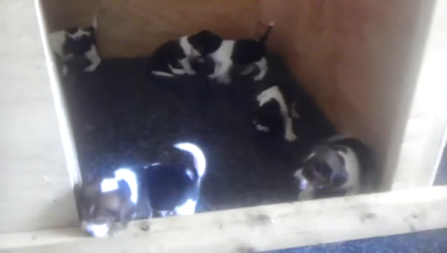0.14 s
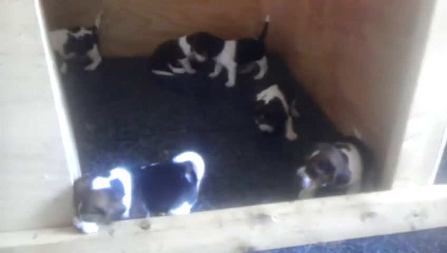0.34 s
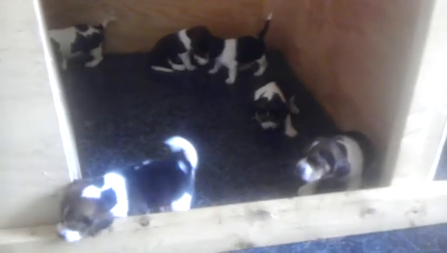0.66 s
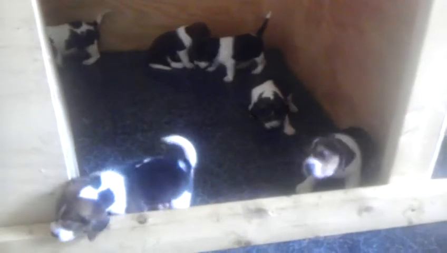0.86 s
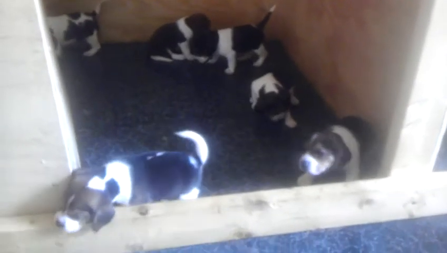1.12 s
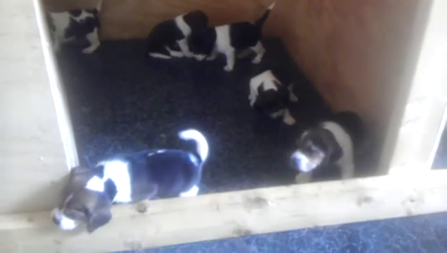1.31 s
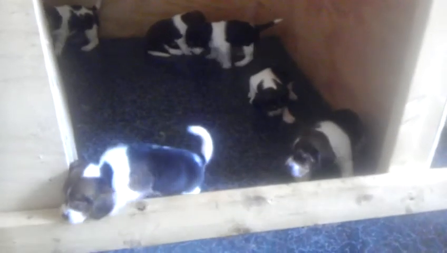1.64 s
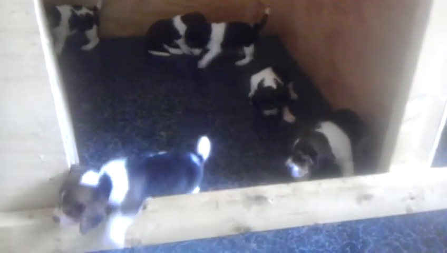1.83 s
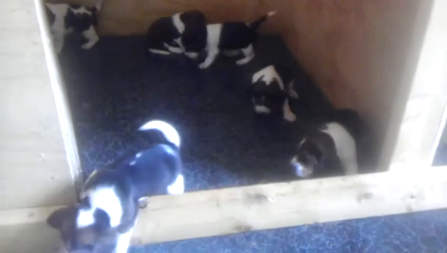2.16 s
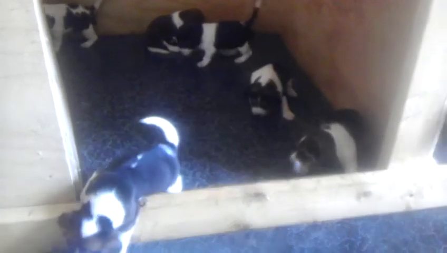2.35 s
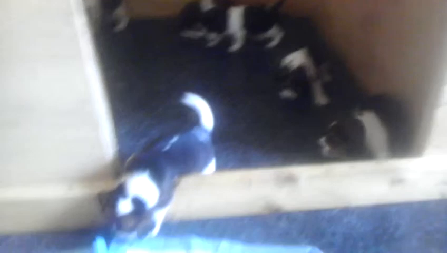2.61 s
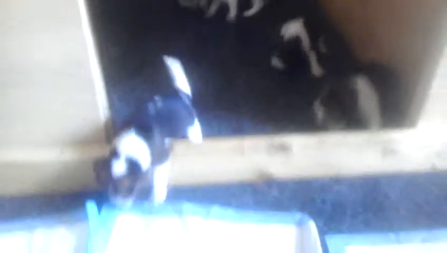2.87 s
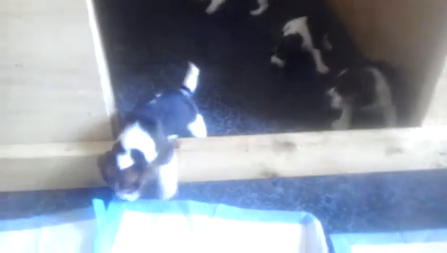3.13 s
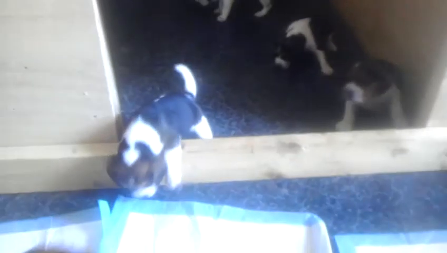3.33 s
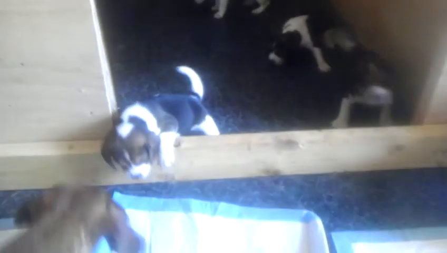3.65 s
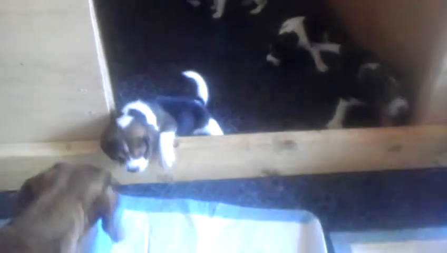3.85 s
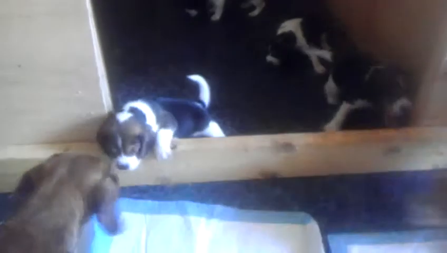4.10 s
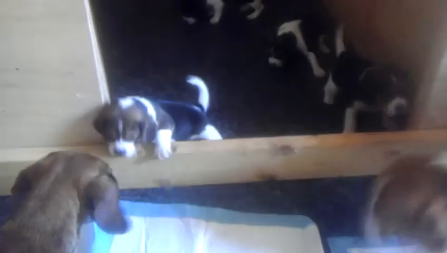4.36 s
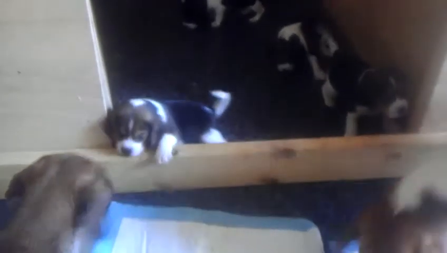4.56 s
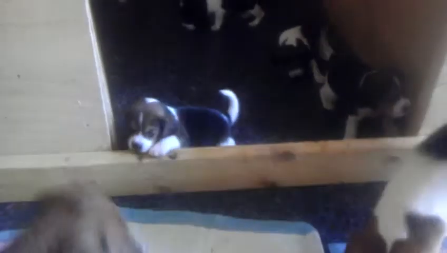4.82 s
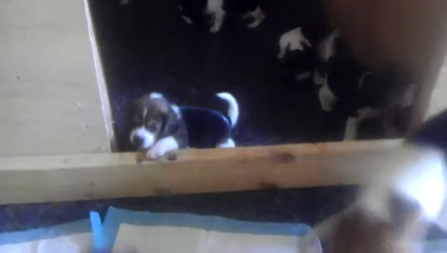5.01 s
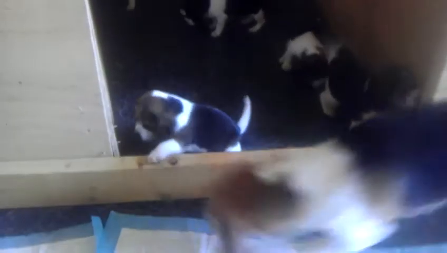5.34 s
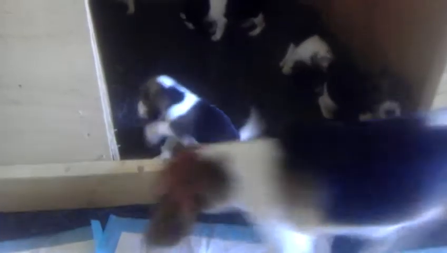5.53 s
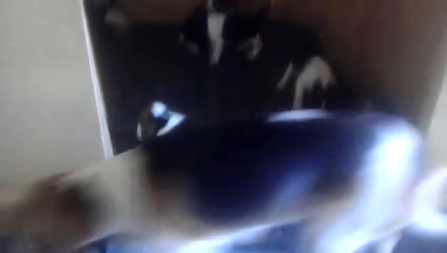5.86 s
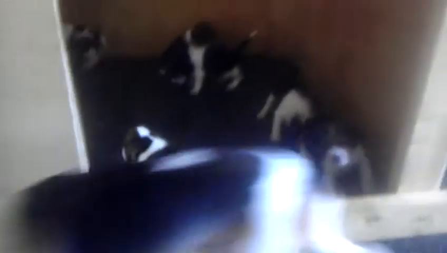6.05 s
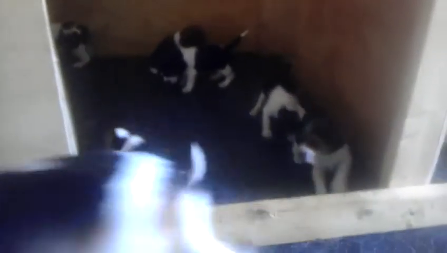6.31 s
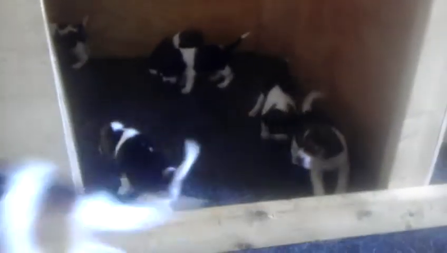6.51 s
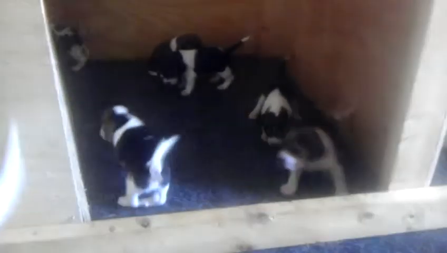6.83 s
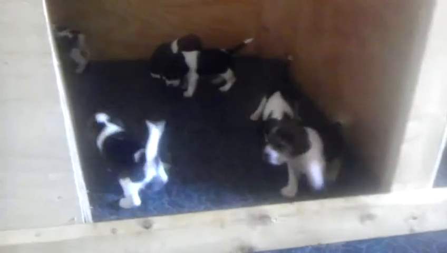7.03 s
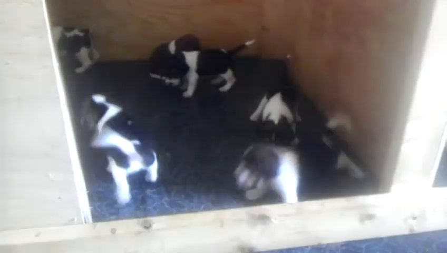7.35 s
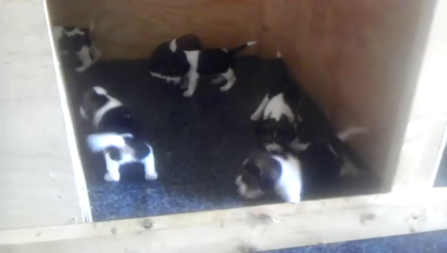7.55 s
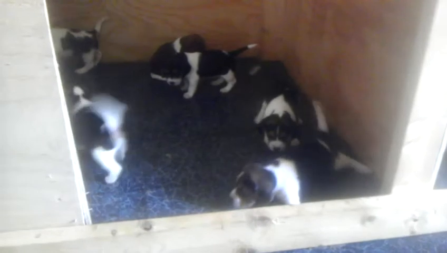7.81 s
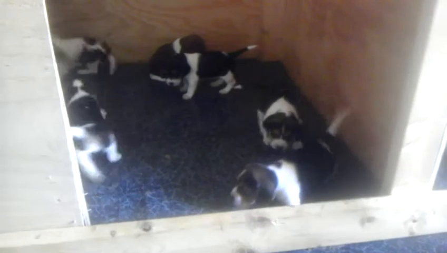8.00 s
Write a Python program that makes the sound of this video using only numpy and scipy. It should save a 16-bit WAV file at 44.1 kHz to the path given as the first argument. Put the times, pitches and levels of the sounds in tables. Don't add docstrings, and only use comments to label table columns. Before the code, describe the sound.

Close in a small bare room, a puppy gives a string of short, high, gliding whines over faint shuffling. After about four seconds the whining stops and a paw thumps dully on a wooden plank. Sparse soft scuffs follow, with one very thin nasal whistle, then brisk claw clicks on hard floor, hollow board knocks and a brief wooden scrape at the end. Light microphone hiss rises and falls with the movement.

```python
import sys
import numpy as np
from scipy import signal
from scipy.fft import rfft, irfft, next_fast_len
from scipy.io import wavfile
from scipy.ndimage import uniform_filter1d, minimum_filter1d, map_coordinates

SR = 44100
rng = np.random.default_rng(int(sys.argv[2]) if len(sys.argv) > 2 else 0)


def invert_db(x):
    u = np.asarray(x, float) / 20
    return 10 ** u


def transcribe(u):
    v = np.clip(np.atleast_2d(u).T, -1, 1)
    q = np.round(v * 32767).astype(np.int16)
    wavfile.write(sys.argv[1], SR, q)


N = 360297

# start_s, turn_s, end_s, level_db, swell_to_turn_db
WHINES = [(0, 0.106, .19, -29.5, 2.5), (0.33, 0.397, .52, -28, 10), (0.677, 0.678, .735, -37, 5),
          (0.868, 0.88, .92, -36, 4), (1.455, 1.485, 1.5, -33.5, 2), (1.709, 1.765, 1.787, -31, -2.5),
          (1.921, 1.984, 2.045, -28, -4), (2.193, 2.254, 2.308, -28, -5), (2.47, 2.55, 2.655, -26, 5),
          (2.829, 2.891, 3.015, -30, 9), (3.195, 3.267, 3.315, -37, 8), (3.452, 3.496, 3.545, -34.5, 6),
          (3.764, 3.823, 3.838, -25.5, 7), (4.006, 4.06, 4.082, -27, 3), (4.225, 4.287, 4.335, -26.5, 7)]
# first_note_held_s, start_hz, turn_hz, before_break_hz, end_hz
WHINE_TUNES = [(0.032, 1115, 1042, 996, 943), (0, 972, 982, 947.3, 863), (0, 930, 937, 908, 890),
               (0, 914, 942, 897, 857), (0, 735, 807, 810, 705), (0, 750, 808, 762, 720),
               (0, 751, 959.5, 916, 880), (.028, 796.3, 948, 850, 750), (0, 939, 1063, 977, 762),
               (0, 975, 998.5, 1010, 985), (0, 959, 965, 960, 800), (0, 777, 763, 858, 786),
               (0, 965, 1160, 1165, 1150), (0, 1176, 1298, 1360, 1393), (0.01, 1000, 1055, 1005, 880)]
# octave_db, overtones_db, top_lift_db, pan_db, roughness_0_1
MOUTHS = [(-8, -2.5, -3.5, -2, 0.23), (-5.5, -13.5, 4.5, -1, 0.24), (7, -9, 5, -2, 0.6),
          (6, -10, 7.5, -2, 0.63), (-10, -25, -2, 0, 1), (-16, -24, -3, -5.5, 0.57),
          (-10.5, -20, -13, -3.5, .6), (-7, -15.5, -6, -3.5, 0.5), (-18.5, -17.5, -7, -0.5, 0),
          (-18, -22, 5, -2, 0.1), (0, -7, 5, -2, 0.5), (3, -12, 11.5, 2, 0.55), (-21, -18, 5, -2, 0.72),
          (-29, -25, 13.5, 6.5, 0.41), (-7.5, -23, 17, 7, 0.59)]
# fundamental_db, octave_db, overtones_db
PHRASING = [(.045, 0, 0, -1, -6), (.03, 5, 0, 0, 0), (.025, 0, 3, -17, -5), (.02, 0, 2, -17, -5),
            (.014, -3, 0, -8, 0), (.015, 3, -3, -3, -3), (.02, 12, -3, 0, -3), (.014, 14, 0, 0, -4),
            (.035, 5, 0, 0, 0), (.012, 2, -2, 6, 3), (.03, 3, -3, 3, 2), (.03, 10, 2, -6, 0),
            (.012, -5, 0, -8, 0), (.015, 3, -2, 0, 0), (.025, 0, -1.5, -1, -2)]
# fundamental_db, octave_db, overtones_db
BREAK_DB = (-3, -10.5, -28)
SWELL_SHARE = (1.13, 0.8)
# freq_hz, level_db
THROAT = [(700, -13), (2800, -22), (3600, -17), (4500, 5.5), (5200, 9), (6000, -5), (7000, -18),
          (9000, -17.5), (11500, -31), (14000, -34)]
# freq_hz, width_hz, level_db
PEN_MODES = [(777, 27.5, 4.5), (887.6, 17, 7), (991.7, 38, -6), (1072, 39, 5), (1228, 23, -5.5),
             (1366, 110, 1)]
# time_s, level_db
BUSTLE = [(0, -54), (.29, -56.5), (.9, -64.5), (1.2, -66), (1.41, -63), (1.73, -62), (2.75, -60),
          (3.3, -56), (3.621, -68.5), (3.85, -61.5), (4.23, -62.5), (4.64, -75.5), (5.03, -72),
          (5.62, -64.5), (6, -71.5), (7.42, -69.5), (7.65, -55.5), (8.17, -61.5)]
# freq_hz, density_db_per_hz
RUMBLE = [(15, -77), (25, -43), (66, -10), (160, -10.5), (211, 2), (258, -8), (399, -6.5), (557, -10),
          (800, -13.5), (1040, -19), (1760, -120)]
# freq_hz, density_db_per_hz
SCUFF = [(350, -23.5), (600, -6.5), (1040, 2), (1210, 1), (1460, -6), (1570, -0.5), (1940, -2.5),
         (2990, -1), (5600, -9), (6300, -17), (9750, -17.5), (16500, -120)]
# freq_hz, density_db_per_hz
HISS = [(4500, -17), (6000, -24), (7500, -4), (11000, 4.5), (14200, 3.5)]
# time_s, peak_db, t60_s, paw_weight_db
STEPS = [(.3295, -34.5, 0.12, -23), (.6818, -43.5, 0.12, 5), (.846, -35.5, 0.44, 3),
         (1.0819, -43.5, 0.31, -13), (1.295, -36, 0.29, -2.5), (1.507, -42.5, 0.49, 2),
         (2.6883, -28, 0.14, -15), (3.1538, -33, 0.076, -3.5), (3.4385, -29.5, 0.36, -10.5),
         (4.564, -43.5, 0.39, -10), (5.8078, -39.5, 0.34, -2), (5.9713, -39.5, 0.2, -9),
         (6.2681, -32.5, 0.3, -6.5), (6.4199, -26, 0.23, -5), (6.5634, -48.5, 0.076, 0),
         (6.9265, -40, 0.23, -2.5), (7.0326, -18.5, 0.14, -18.5), (7.2487, -22, 0.18, -14),
         (7.3298, -33, 0.15, -15), (7.511, -40, 0.31, 4), (7.2551, -16.5, 0.23, -10),
         (7.345, -36, 0.16, -11.5), (1.154, -39, .1, -22)]
# brightness_db, sliding_s
STEP_FEEL = [(5, 0.0098), (5, 0.0082), (-1, 0.018), (11.5, 0.0096), (6.5, 0), (14, 0.0063), (6.5, 0.012),
             (20.5, 0.0039), (2, 0.017), (-1, 0.014), (-8, 0.015), (-2, 0.01), (-9.5, 0.0061), (-6.5, 0),
             (-9, 0.0055), (-3, 0.0088), (-4, 0.0024), (-6.5, 0), (6, 0.0099), (9, 0.0041), (-2.5, 0),
             (-6, 0), (2, 0)]
# time_s, peak_db, t60_s, paw_weight_db
SKIDS = [(.198, -46.5, 0.26, 13), (1.165, -39, 0.14, -17), (1.345, -45.5, 0.263, 7),
         (1.6838, -31, 0.21, -17), (1.8397, -34.5, 0.062, -3), (2.1779, -44, 1, 0), (2.378, -39, 0.25, 0.5),
         (2.5774, -34.5, 0.53, -34), (2.9664, -27.5, 0.17, -18), (3.2755, -29.5, 0.12, -20),
         (3.05, -54, 0.19, 18.5), (3.3448, -46.5, 0.4, 9.5), (4.182, -37, 0.76, -13),
         (4.885, -52.5, 0.16, -5), (5.088, -47, 0.28, -3.5), (5.236, -48, 0.065, -12),
         (5.4194, -44, 1, -12.5), (5.6555, -39, 0.077, -16.5), (5.8296, -32.5, 0.21, -1.5),
         (6.1035, -49, .32, -3), (6.168, -44, 0.31, -14.5), (6.6692, -55.5, 0.97, -7.5),
         (6.838, -41, 0.13, -4), (7.001, -38, 0.085, -4), (7.3494, -40.5, 0.45, -8.5),
         (7.56, -51, 0.22, 10.5), (7.66, -44, 0.51, 2.5), (7.7662, -36, 0.26, -2),
         (7.913, -37.5, 0.54, -32), (8.0162, -40.5, 0.4, -21), (.13, -37, 0.45, -6), (4.848, -58, 0.24, 1),
         (7.212, -53.5, .2, -13), (6.403, -43.5, 0.093, -7), (5.33, -54.5, .2, -13), (1.39, -50, 0.43, -14),
         (1.56, -52, 0.24, -23), (5.16, -56, 0.22, -10), (.05, -43, .2, -28), (7.09, -48, 0.081, -6.5),
         (6.79, -48, .2, -5), (5.59, -47, .2, -12), (7.48, -50, .2, -3)]
# brightness_db, sliding_s
SKID_FEEL = [(-6, 0.023), (5, 0.057), (10, 0.0079), (-5.5, 0.031), (-11, 0.0069), (5, .01), (10.5, 0.012),
             (2, .01), (1, 0.065), (-8, 0.011), (-3, .01), (-7, 0.034), (1, .01), (-5, 0.031), (1, 0.018),
             (-9, 0.0069), (2, .01), (-8, 0.0077), (-7, 0.0089), (-1, 0.038), (-0.5, 0.03), (-8, 0.052),
             (3, 0.0081), (1, 0.012), (1.5, .01), (8, .01), (2, .01), (-5, 0.013), (5.5, .01), (-6, .01),
             (-2.5, 0.035), (-3, 0.04), (0, .03), (-8, .01), (6, 0.067), (3, 0.095), (10.5, 0.034),
             (3, 0.043), (9, 0.054), (-10, 0.022), (2, .04), (-3, .05), (-3, .03)]
# freq_hz, level_db
CLAW = [(1000, -20), (1800, -7), (2600, 1), (3600, 0.5), (5500, -4), (6500, -13), (9000, -15.5),
        (14000, -41.5)]
# freq_hz, level_db
BLUNT = [(700, -18), (1300, -4.5), (2300, 2.5), (3200, -1), (4500, -25), (8000, -27)]
# freq_hz, level_db
FLOOR_BODY = [(400, -8), (650, -8.5), (950, -4), (1500, -8), (2200, -31)]
# freq_hz, level_db
THUD = [(60, -42.5), (120, 6.5), (210, 9.5), (400, 4), (700, -28)]
# time_s, peak_db, pitch_hz
KNOCKS = [(0.195, -34.5, 410), (0.215, -36, 662), (0.868, -38.5, 211), (1.246, -33, 374), (1.345, -31, 365),
          (1.447, -33.5, 408), (1.505, -34.5, 597), (2.292, -39, 220), (3.051, -35.5, 480),
          (3.35, -34, 410), (4.863, -53, 210), (7.529, -36, 296), (7.628, -31, 384), (7.69, -39, 210),
          (7.856, -39, 192), (8.115, -27, 205), (5.238, -52, 1200), (7.41, -48, 1200), (7.775, -44, 1180),
          (1.315, -49, 1130), (1.35, -37, 580)]
# time_s, peak_db, t60_s
THUMPS = [
    (4.576, -24.5, 0.11),
    (4.588, -23.5, 0.21),
]
# freq_hz, density_db_per_hz
PLANK = [(71, -67.5), (120, -62), (247, -14), (500, -7), (900, 0), (1500, -15.5), (2300, -13), (4400, -38),
         (6000, -76), (7800, -102), (13200, -120)]
# time_s, level_db
DRAG = [
    (8.09, -52),
    (8.108, -34.5),
    (8.17, -33),
]
# freq_hz, width_hz, level_db
BOARD_MODES = [(210, 30, 2.5), (436, 48, -8.5), (886, 140, -13), (1317, 65, -11), (1693, 33, 1),
               (1920, 90, -4), (2490, 26, -37), (2800, 55, -17)]
# freq_hz, correlation
ALIKE = [(60, 0.82), (200, 0.96), (700, 0.75), (2000, 0.15), (6000, 0.088), (14000, 0.099)]
# freq_hz, t60_s
ROOM = [(150, 0.24), (900, 0.24), (2000, 0.23), (5000, 0.21), (12000, 0.045)]
# start_s, stop_s, above_hz
TREBLE_GAPS = [
    (0.07, 0.173, 11800),
    (0.433, 0.48, 12200),
    (1.467, 1.493, 6400),
    (1.73, 1.81, 6900),
    (1.92, 1.995, 8600),
    (2.175, 2.319, 7500),
    (2.565, 2.619, 9300),
    (2.943, 3.01, 11800),
    (4.585, 4.613, 5030),
    (8.104, 8.175, 7560),
]

PEN_DIRECT = 0.93
ROUGH_DB, ROUGH_PITCH_RATIO = 5, 0.012
CHEST_DB, CREAK_DB = -38, -29
RUMBLE_DB, RUMBLE_DB_PER_SCUFF_DB = -61.5, 0.71
BODY_DB, BODY_DB_PER_WEIGHT_DB = -7, 0.8
WHISTLE_START_S, WHISTLE_END_S, WHISTLE_RISE_S, WHISTLE_FALL_S = 5.36, 5.64, 0.14, 0.07
WHISTLE_HZ, WHISTLE_DB, WHISTLE_SAG_HZ_PER_S = 4160, -53.5, 300
QUAVER_HZ, QUAVER_PER_S = 35, 10.5
TOP_HZ = 14150


def along(points, hz):
    f, v = np.transpose(points)
    return np.interp(np.log(hz + 1), np.log(f + 1), v)


def unit(x):
    return x / np.sqrt(np.mean(x ** 2) + 1e-20)


def wobble(rate, size):
    knots = rng.standard_normal(int(size * rate / SR) + 4)
    return map_coordinates(knots, [np.arange(size) * rate / SR])


def fades(t, rise_s, fall_s):
    return np.clip(np.minimum((t - t[0]) / rise_s, (t[-1] - t) / fall_s), 0, 1)


def add(track, s, x):
    i = max(round(s * SR), 0)
    track[:, i:i + x.shape[-1]] += x[..., :N - i]


def call(start, knots):
    s, *columns = np.transpose(knots)
    t = np.arange(start, s[-1], 1 / SR)
    return t, [np.interp(t, s, column) for column in columns]


def resonances(modes, f):
    return sum((-1) ** k * invert_db(db) * 1j * f * width / (hz * hz - f * f + 1j * f * width)
               for k, (hz, width, db) in enumerate(modes))


def rush(spectrum, patchy_db, spiky_db, size):
    z = signal.stft(rng.standard_normal((2, size + 512)), nperseg=512)[2]
    patches = uniform_filter1d(rng.standard_normal(z.shape[1:]), size=6, axis=0)
    patches = unit(uniform_filter1d(patches, size=8, axis=1))
    pair = signal.istft(z * invert_db(patchy_db * patches), nperseg=512)[1][:, :size]
    pair = pair * invert_db(spiky_db * wobble(400, size))
    hz = np.fft.rfftfreq(size, 1 / SR)
    turn = np.arccos(np.clip(along(ALIKE, hz), -1, 1)) / 2
    shape = invert_db(along(spectrum, hz)) * [np.cos(turn), np.sin(turn)]
    mid, side = irfft(rfft(pair) * shape, size)
    return unit(np.array([mid + side, mid - side]))


def room(x, wet_db):
    burst = rush([(20, 0), (20000, 0.034)], 0, 0, size=SR // 3)
    hz, t, z = signal.stft(burst, SR, nperseg=256)
    tail = signal.istft(z * invert_db(-60 * t / along(ROOM, hz)[:, None]), SR, nperseg=256)[1]
    tail = np.pad(tail / np.linalg.norm(tail[0]), ((0, 0), (130, 0)))
    wet = signal.fftconvolve(x.mean(0)[None], tail, axes=1)
    balance = np.linalg.norm(x, axis=1, keepdims=True) / np.linalg.norm(x) * np.sqrt(2)
    direct = np.pad(x, ((0, 0), (0, wet.shape[1] - x.shape[1])))
    return invert_db(wet_db) * wet * balance ** 0.49 + direct


def heard(x, wet_db):
    y = room(x, wet_db)
    return y * np.linalg.norm(x) / np.linalg.norm(y)


def whines():
    out = np.zeros((2, N))
    ears = np.array([[0.5], [-0.5]])
    for whine, tune, mouth, phrase in zip(WHINES, WHINE_TUNES, MOUTHS, PHRASING):
        start, top, end, db, swell_db = whine
        held, *notes_hz = tune
        octave_over_db, high_over_db, lift_db, pan_db, rough = mouth
        break_s, octave_swell_db, low_drift_db, octave_drift_db, high_drift_db = phrase

        times = [start, top, end - min(break_s, (end - top) * 3 / 4), end]
        knots = np.transpose([times, [1, 0, 0, 0], [0, 0, 1, 1], [0, 0, 0, 1]])
        t, (young, sagged, broken) = call(start, knots)
        size = len(t)

        glide = np.sin(np.pi / 2 * np.clip((t - start - held) / (top - start - held), 0, 1)) ** 1.4
        hz = notes_hz[0] + np.diff(notes_hz) @ [glide, sagged ** 1.624, broken ** 1.16]
        hz = uniform_filter1d(hz, size=400, mode="nearest")
        hz = hz * (1 + 0.00495 * wobble(93.8, size) + rough * ROUGH_PITCH_RATIO * wobble(260, size))
        turn = 2 * np.pi * np.cumsum(hz) / SR

        low_db = db - SWELL_SHARE[0] * swell_db * young + low_drift_db * sagged + BREAK_DB[0] * broken
        octave_db = db + octave_over_db - octave_swell_db * young
        octave_db = octave_db + octave_drift_db * sagged + BREAK_DB[1] * broken
        high_db = db + high_over_db - SWELL_SHARE[1] * swell_db * young
        high_db = high_db + high_drift_db * sagged + BREAK_DB[2] * broken
        flutter = invert_db(1.8 * wobble(60, size) + rough * ROUGH_DB * wobble(160, size))
        edge = fades(t, 0.0063, 0.0049)

        padded = next_fast_len(size + SR // 4)
        pen = PEN_DIRECT + resonances(PEN_MODES, np.fft.rfftfreq(padded, 1 / SR))
        first = edge * flutter * invert_db(low_db - 7.5) * np.sin(turn)
        first = irfft(rfft(first, padded) * pen, padded)
        second = flutter * invert_db(octave_db - 7 + 2.5 * wobble(45, size)) * np.sin(2 * turn + 1)
        high = invert_db(high_db - 29.5) * rush(THROAT, 2.8, 1.5, size)[0] * (1 + np.cos(turn))
        for k in range(3, 17):
            partial_db = high_db - 14.5 + along(THROAT, k * hz) + lift_db * (k * hz > 6800)
            high += invert_db(partial_db + 2.9 * wobble(41, size)) * np.sin(k * turn + k * k)
        closing = np.clip(np.arange(size)[::-1] / (0.0063 * SR), 0, 1)

        creak = rough * invert_db(low_db + CREAK_DB) * wobble(306.0, size) * np.sin(3 * turn / 2)
        chest = invert_db(db + CHEST_DB) * rush(THUD, 2.8, 2.7, size)
        pan = invert_db(ears * pan_db)
        voice = first * pan
        voice[:, :size] += edge * (creak * pan + chest)
        add(out, start, heard(1.43 * edge * second * pan, wet_db=-7))
        add(out, start, heard(1.475 * voice, wet_db=-0.5))
        add(out, start, heard(1.54 * edge * closing * high * invert_db(ears * 5.2), wet_db=-3.5))
    return out


def shuffle(feet):
    scuff_db = np.interp(np.arange(N) / SR, *np.transpose(BUSTLE))
    rumble_db = RUMBLE_DB + RUMBLE_DB_PER_SCUFF_DB * (scuff_db + 62.5)
    stir = wobble(14, N)
    rumble = invert_db(rumble_db - 2.5 + 2.5 * stir) * rush(RUMBLE, 1.5, 0.85, N)
    scuff = invert_db(scuff_db + 2 + 1.5 * stir) * rush(SCUFF, 1.3, 1.5, N)
    power = uniform_filter1d(((scuff + feet) ** 2).mean(0), size=1200)
    busy_db = 10 * np.log10(np.abs(power) + 1e-9)
    gate_db = 0.51 * np.clip(busy_db + 69.0, -25, 12)
    hiss = invert_db(-72.0 + gate_db) * rush(HISS, 0.99, 0.61, N)
    return rumble + scuff + hiss


def steps(contacts, feel, tick, rise_s, gain_db):
    claw, blunt, body, thud = np.zeros((4, 1, N))
    t = np.arange(SR // 3) / SR
    for (s, db, t60_s, weight_db), (bright_db, slide_s) in zip(contacts, feel):
        after = np.clip(t - slide_s, 0, None)
        fade = invert_db(db + gain_db - 60 * after / t60_s) * (1 - np.exp(-t / rise_s))
        grit = fade + tick * invert_db(db + gain_db - 60 * t / 0.009)
        slow_fade = fade * invert_db(18 * after / t60_s) * (1 - np.exp(-t / 0.004))
        add(claw, s, invert_db(bright_db / 2 - 4.5) * grit)
        add(blunt, s, invert_db(-bright_db / 2 - 5.5) * grit)
        add(body, s, invert_db(BODY_DB + BODY_DB_PER_WEIGHT_DB * weight_db + 4.5) * fade)
        add(thud, s, invert_db(weight_db - 2.0) * slow_fade)
    grains = claw * rush(CLAW, 1.5, 3, N) + blunt * rush(BLUNT, 1.5, 3, N)
    dry = grains + body * rush(FLOOR_BODY, 1.96, 6.1, N) + thud * rush(THUD, 2.9, 4.7, N)
    return room(dry, wet_db=-7.0)[:, :N]


def knocks():
    out = np.zeros((2, N))
    t = np.arange(SR // 4) / SR
    for s, db, hz in KNOCKS:
        ring = np.sin(2 * np.pi * hz * t) + 0.28 * np.sin(2 * np.pi * 1.1 * hz * t)
        bump = invert_db(db - 6.0 - 60 * t / 0.094) * (1 - np.exp(-t / 0.0023)) * ring
        add(out, s, heard(1.44 * bump * np.ones((2, 1)), wet_db=2.0))
    return out


def thump():
    out = np.zeros((2, N))
    t = np.arange(SR // 4) / SR
    for s, db, t60_s in THUMPS:
        fall = invert_db(-60 * t / t60_s) + 0.92 * invert_db(-60 * t / 0.03)
        attack = 1 - np.exp(-t / 0.0012)
        wood = rush(PLANK, 1.2, 2, len(t))
        add(out, s, heard(invert_db(db - 13.0) * fall * attack * wood, wet_db=-10.5))
    return out


def whistle():
    t = np.arange(WHISTLE_START_S, WHISTLE_END_S, 1 / SR)
    since = t - WHISTLE_START_S
    quaver = QUAVER_HZ * np.sin(2 * np.pi * QUAVER_PER_S * since - 2)
    pitch_hz = WHISTLE_HZ - WHISTLE_SAG_HZ_PER_S * since + quaver
    level = invert_db(WHISTLE_DB - 1.0 + 1.0 * wobble(61, len(t)))
    tone = level * np.sin(2 * np.pi * np.cumsum(pitch_hz) / SR)
    breath = fades(t, WHISTLE_RISE_S, WHISTLE_FALL_S) ** 2
    out = np.zeros((2, N))
    add(out, WHISTLE_START_S, room(breath * tone * np.ones((2, 1)), wet_db=-29))
    return out


def drag():
    start = DRAG[0][0]
    t, (level_db,) = call(start, DRAG)
    size = len(t)
    jerks = rng.standard_normal(size) * invert_db(1.6 * wobble(520, size))
    f = np.fft.rfftfreq(size, 1 / SR)
    wood = resonances(BOARD_MODES, f) + 0.14 * (f < 3300) + 0.014
    sound = invert_db(level_db - 1.5) * unit(irfft(rfft(jerks) * wood, size))
    out = np.zeros((2, N))
    add(out, start, room(sound * invert_db([[-1.7], [1.7]]), wet_db=2.0))
    return out


def scene():
    feet = steps(STEPS, STEP_FEEL, tick=2.4, rise_s=0.00048, gain_db=-16.5)
    feet = feet + steps(SKIDS, SKID_FEEL, tick=0, rise_s=0.0067, gain_db=-11.5)
    return whines() + shuffle(feet) + feet + knocks() + thump() + whistle() + drag()


def roll_off(x):
    return signal.sosfilt(signal.butter(12, 14050, fs=SR, output="sos"), x)


def record(dry):
    bass_cut = signal.butter(2, 110, "high", fs=SR, output="sos")
    hz, t, z = signal.stft(signal.sosfilt(bass_cut, dry), SR, nperseg=512)
    z = z * (hz < TOP_HZ)[:, None]
    power = uniform_filter1d(np.abs(z) ** 2, size=3, axis=1)
    nearby_peak = -minimum_filter1d(-power, size=41, axis=1)
    masked = power < invert_db(-39) * nearby_peak
    lasting = uniform_filter1d(1.0 * masked, size=5, axis=2) > 0.5
    z = invert_db(6) * z * ~(lasting & (hz > 3800)[:, None])
    for start, stop, above_hz in TREBLE_GAPS:
        z = z * ~((hz > above_hz)[:, None] & (t > start) & (t < stop))
    mix = signal.istft(z, SR, nperseg=512)[1][:, :N]
    return roll_off(mix)


dry = scene()
out = record(dry)
transcribe(out)
```